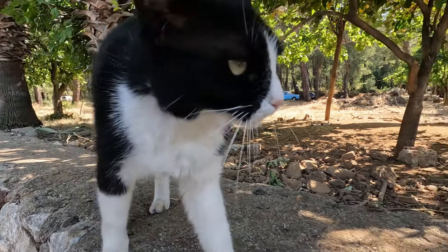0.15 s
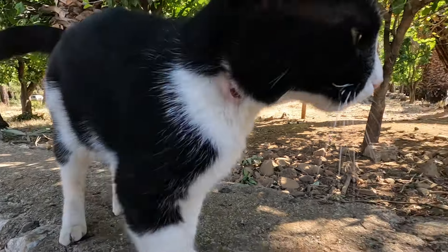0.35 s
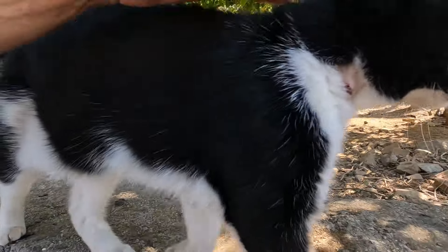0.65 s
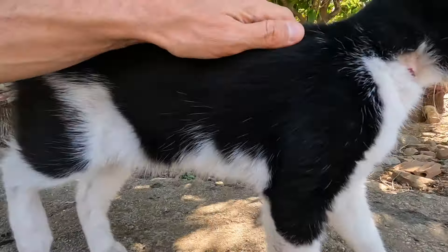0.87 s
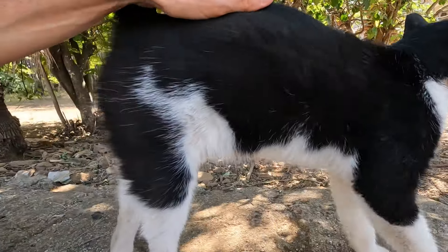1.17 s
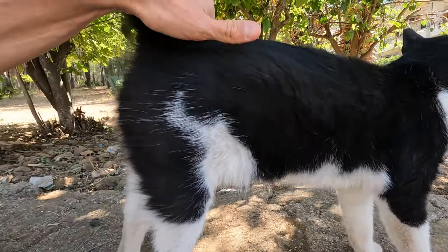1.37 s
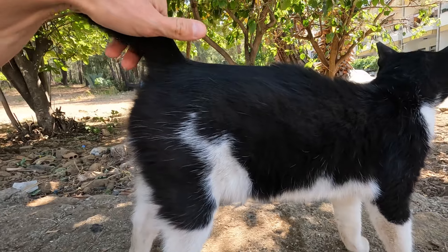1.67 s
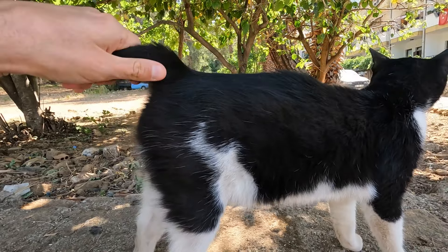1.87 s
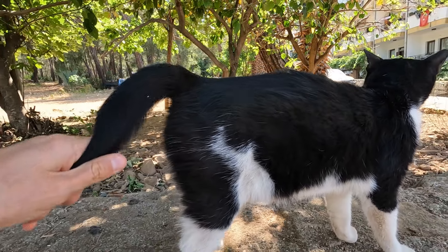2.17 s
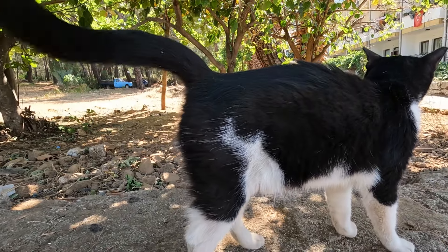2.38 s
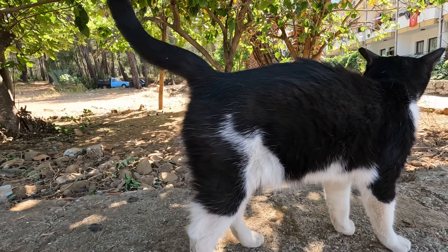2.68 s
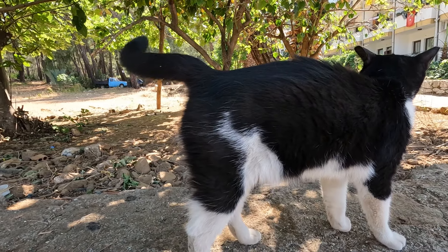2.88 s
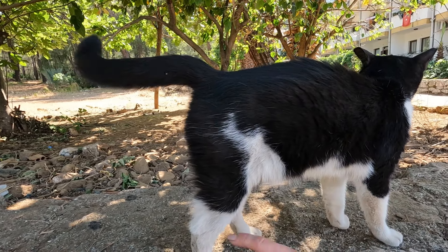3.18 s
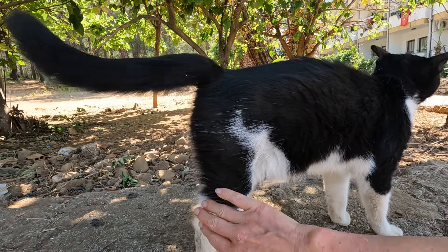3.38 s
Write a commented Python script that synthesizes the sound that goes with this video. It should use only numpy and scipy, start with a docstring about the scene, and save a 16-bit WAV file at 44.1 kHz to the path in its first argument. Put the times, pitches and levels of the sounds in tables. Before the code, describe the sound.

Outdoors, close stereo microphone: a brief throaty cat trill, airy snort and grunt in the first half second, a vehicle fading away, then soft hand rubs, distant engine drone and weak bird chirps.

```python
"""A cat close on the left gives a closed-mouth trill, snorts through its nose and grunts once.
Its voice is a hum at the fold rate plus gated pulses, breath and a high ring; its snort is hiss and whistles.
A hand strokes the fur in gritty noise bursts and ticks. Birds are gliding sines, insects a narrow hiss.
Behind lie a leaving vehicle (tones, tyre roar), an engine drone (sine orders) and a wash of far traffic
and leaves (random spectra)."""
import sys
import numpy as np
from scipy import signal
from scipy.fft import rfft, irfft
from scipy.io import wavfile
from scipy.ndimage import uniform_filter1d

SR = 44100
rng = np.random.default_rng(int(sys.argv[2]) if len(sys.argv) > 2 else 0)


def rack_gain(trim_db):
    """Turn a fader trim in dB into the linear factor to multiply a signal by."""
    fader = np.asarray(trim_db, float)
    return 10 ** (fader / 20)


def put_to_file(sound):
    """Save the sound as 16-bit audio at rate SR, in the file named by the first command-line argument."""
    columns = np.atleast_2d(sound).T  # one column per channel
    safe = np.clip(columns, -1, 1)
    whole_steps = np.round(safe * 32767)
    wavfile.write(sys.argv[1], SR, whole_steps.astype(np.int16))


N = 156114  # length [samples]


def evened(x):
    """Scales to rms 1."""
    return x / np.sqrt(np.mean(x ** 2) + 1e-20)


def read(points, hz):
    """Reads a spectrum on a log-frequency axis."""
    f, value = np.transpose(points)
    return np.interp(np.log(hz + 1), np.log(f + 1), value)


def curve(points, t):
    """Reads (time, value) points along the time axis."""
    return np.interp(t, *np.transpose(points))


def colour(x, db):
    """Filters by a dB function of frequency."""
    gain = rack_gain(db(np.fft.rfftfreq(x.shape[-1], 1 / SR)))
    return irfft(rfft(x) * gain, x.shape[-1])


def peaks(rows):
    """Several resonances as one dB function of frequency."""
    return lambda f: 20 * np.log10(sum(rack_gain(db) / (1 + ((f - hz) / width) ** 2) for hz, width, db in rows))


def slow(rate_hz):
    """Smooth random drift of rms 1, its spectrum 9 dB down at rate_hz."""
    return evened(colour(rng.standard_normal(N), lambda f: -np.minimum(9 * (f / rate_hz) ** 2, 200)))


def glide(hz):
    """Phase in radians of a moving frequency."""
    return 2 * np.pi * np.cumsum(hz) / SR


def humps(rows):
    """Sum of humps (nominal centre, nominal length, dB) that rise faster than they fall."""
    t, out = np.arange(N) / SR, np.zeros(N)
    for s, length, db in rows:
        u = np.clip((t - s) / (1.44 * length) + 0.37, 0, 1)
        out += rack_gain(db) * np.sin(np.pi * u ** 0.55) ** 2
    return out


def echoes(x, t60):
    """Diffuse reflections: a decaying noise tail, different at each microphone."""
    tail = rng.standard_normal((2, 8000)) * rack_gain(-60 * np.arange(8000) / SR / t60)
    return signal.fftconvolve(x[None], tail / np.linalg.norm(tail[0]), axes=1)[:, :N]


def placed(x, left_db):
    """Raises the left by left_db and lowers the right by as much."""
    return x * rack_gain([[left_db], [-left_db]])


# wash spectrum: (frequency [Hz], relative level [dB per Hz])
WASH_SPECTRUM = [(10, -32), (18, -5.5), (45, -5.5), (70, -8), (98, -8.5), (138, -8.5), (236, -17),
                 (304, -17.5), (440, -27.5), (672, -29), (843, -28.5), (1120, -24.5), (1700, -34),
                 (2330, -42.5), (3500, -45.5), (6280, -54), (8500, -50), (10000, -51.5), (11000, -56.5),
                 (12400, -60.5), (14000, -71), (15500, -90)]
# slow course of the wash: (time [s], relative level [dB])
WASH_COURSE = [(0, 3), (.5, 1.5), (1.2, 1), (1.6, 2), (2.4, 1.5), (3.54, 0.5)]
# how alike the two microphones hear it: (frequency [Hz], shared part of the power [0..1])
WASH_LIKENESS = [(25, .8), (60, .93), (130, .98), (290, .94), (640, .72), (1410, .55), (3100, .28),
                 (6820, .3), (10000, .15), (15000, .1)]
# stereo balance of the wash: (frequency [Hz], left over right [dB])
WASH_BALANCE = [(60, 0), (200, -.4), (380, .5), (700, 2.5), (1300, 3.5), (2400, 2), (4400, 1.5), (8100, 4),
                (15000, 4)]


def wash():
    """Far traffic and leaves: random spectra with drifting patches and a swell."""
    base_db, patch_db, swell_db, swell_hz = -33.5, 1.3, 1.1, 5.4
    frames, hz = N // 512 + 5, np.fft.rfftfreq(2048, 1 / SR)
    a, b, c, d, patches = rng.standard_normal((frames, 1025, 5)).T
    # smooth over 20 bins, then 8 frames
    patches = evened(uniform_filter1d(uniform_filter1d(patches, size=20, axis=0), size=8, axis=1))
    same = np.sqrt(np.clip(read(WASH_LIKENESS, hz), 0, 1))[:, None]
    left = a + 1j * b
    right = same * left + np.sqrt(1 - same ** 2) * (c + 1j * d)
    z = np.array([left, right * rack_gain(-read(WASH_BALANCE, hz))[:, None]])
    z *= rack_gain(read(WASH_SPECTRUM, hz)[:, None] + patch_db * patches)
    x = evened(signal.istft(z, nperseg=2048, noverlap=1536)[1][:, :N])
    course_db = curve(WASH_COURSE, np.arange(N) / SR)
    return x * rack_gain(base_db + course_db + swell_db * slow(swell_hz))


# far engine: (time [s], mean firing rate [Hz], level before waver [dB])
DRONE_COURSE = [(0, 57.2, -34), (.25, 59.13, -29), (.45, 61.18, -37), (.65, 59.93, -41), (1.1, 59.73, -40),
                (1.3, 64.9, -30), (1.6, 67.13, -31.5), (1.94, 66.47, -29.5), (2.058, 69.3, -31),
                (2.3, 68.7, -30), (2.4, 69.27, -31), (2.6, 69.32, -31.5), (3.198, 69.65, -33.5),
                (3.54, 71.44, -27)]
# engine orders: (multiple of the firing rate, relative level [dB])
ENGINE_ORDERS = [(1, -1.5), (2, -11.5), (3, -15.5), (4, -20.5)]


def drone():
    """Low orders of a far engine that speeds up, each wavering with the air."""
    waver_db, waver_hz = 1.8, 5
    t, (s, hz, db) = np.arange(N) / SR, np.transpose(DRONE_COURSE)
    phase = glide(np.interp(t, s, hz) + .5 * slow(3.76))
    level_db, out = np.interp(t, s, db), np.zeros(N)
    for k, order_db in ENGINE_ORDERS:
        gain = rack_gain(level_db + order_db + waver_db * slow(waver_hz))
        out += np.sqrt(2) * gain * np.sin(k * phase + 6 * rng.random())
    return out


# fade of the whole leaving vehicle: (time [s], relative level [dB])
LEAVING_FADE = [(0, -31), (.5, -36.5), (.7, -40.5), (.9, -37.5), (1.1, -38), (1.3, -44.5), (1.6, -55)]
# its engine tones: (mean frequency [Hz], relative level before waver [dB])
ENGINE_TONES = [(121, 3), (160, 3.5)]
# swell of those tones alone: (time [s], relative level [dB])
ENGINE_SWELL = [(0, -27), (.5, -17), (.68, 5.5), (.85, -6), (1.1, -1), (1.3, -5)]
# tyre roar spectrum: (frequency [Hz], relative level [dB per Hz])
TYRE_ROAR = [(250, -9), (430, 9.5), (600, -0.5), (900, 13), (1300, 5.5), (3000, -37)]


def leaving():
    """A second vehicle: wavering engine tones and tyre roar that fade away."""
    roar_db, waver_db, waver_hz = -6, 3.6, 5
    t, tones = np.arange(N) / SR, np.zeros(N)
    for hz, db in ENGINE_TONES:
        gain = rack_gain(db + waver_db * slow(waver_hz))
        tones += gain * np.sin(glide(hz + 1.22 * slow(4.7)))
    a, b = colour(rng.standard_normal((2, N)), lambda f: read(TYRE_ROAR, f))
    roar = rack_gain(roar_db) * evened(np.array([a, .5 * a + 0.12 * b]))
    return rack_gain(curve(LEAVING_FADE, t)) * (tones * rack_gain(curve(ENGINE_SWELL, t)) + roar)


def insects():
    """A narrow throbbing hiss from the trees: band noise, separate at each microphone."""
    centre_hz, width_hz, db, throb = 7395, 1160, -63, 0.13
    band = lambda f: -np.minimum(6 * ((f - centre_hz) / width_hz * 2) ** 4, 120)
    hiss = colour(rng.standard_normal((2, N)), band)
    return rack_gain(db) * evened(hiss) * (1 + throb * slow(99))


# bird whistles: (start [s], length [s], from [Hz], to [Hz], level before flutter and panning [dB],
# bend [1 straight, more levels off sooner])
BIRD_WHISTLES = [(2.235, .03, 5450, 5300, -70, 1), (2.375, .025, 5150, 5050, -69, 1),
                 (2.385, .025, 4700, 3950, -68, 1.3), (2.4, .02, 4350, 4500, -69, 1),
                 (2.44, .03, 4600, 4950, -68, 1.5), (2.47, .065, 4350, 4900, -68.5, 1),
                 (2.415, .06, 2500, 2560, -66, 1), (2.668, .062, 5950, 5200, -64, 4),
                 (2.835, .065, 4800, 3200, -63, 1.1), (2.92, .06, 4000, 4720, -64, 2.6),
                 (3.062, .045, 5350, 5050, -66, 3), (3.085, .02, 5500, 6500, -69, 1),
                 (3.106, .06, 6300, 5050, -63.5, 3.3), (3.283, .04, 5450, 3750, -60, 1.1),
                 (3.385, .048, 3750, 4700, -65, .8)]


def birds():
    """Small birds: near-sine glides, fluttering, blurred by echoes among the trees."""
    left_db, echo_db, echo_s, flutter_db = -4.5, -3, .3, 2.2
    out = np.zeros(N)
    for s, length, from_hz, to_hz, db, bend in BIRD_WHISTLES:
        u = np.arange(0, 1, 1 / (length * SR))
        hz = to_hz + (from_hz - to_hz) * (1 - u) ** bend
        note = np.sin(np.pi * u) ** 0.13 * np.sin(glide(hz))
        out[round(s * SR):][:len(u)] += np.sqrt(2) * rack_gain(db) * note
    out = out * rack_gain(flutter_db * slow(160.6))
    return placed(out + rack_gain(echo_db) * echoes(out, echo_s), left_db)


# hand on fur: (start [s], decay time [s], level before envelope and panning [dB], centre [Hz],
# spread [octaves to -6 dB])
FUR_BRUSHES = [(1.181, 0.023, -42.5, 3240, 0.59), (1.207, 0.14, -55, 3420, 0.23),
               (1.551, 0.023, -53.5, 3946, 0.84), (1.589, 0.057, -56, 4840, 0.69),
               (2.317, 0.045, -58.5, 4960, 0.58), (2.783, 0.09, -57, 4825, 0.4),
               (2.878, 0.072, -52, 3460, 0.26)]


def brushes():
    """Hand strokes: gritty noise bursts with a quick start, only partly alike at the two microphones."""
    grit_db, left_db, apart = -1, 2, 0.74
    out = np.zeros((2, N))
    for s, length, db, hz, spread in FUR_BRUSHES:
        t = np.arange(0, 4 * length + 0.0036, 1 / SR)
        a, b, c = rng.standard_normal((len(t), 3)).T
        roughness = rack_gain(grit_db * evened(uniform_filter1d(c, size=40)))
        grit = np.array([a, a + apart * b]) * roughness
        grit = evened(colour(grit, lambda f: -6 * (np.log2((f + 1) / hz) / spread) ** 2))
        u = t / length
        envelope = np.minimum(u / 0.1, 1) * np.exp(-u ** 1.1)
        out[:, round(s * SR):][:, :len(t)] += rack_gain(db) * grit * envelope
    return placed(out, left_db)


# dry ticks of claw, grit and camera body: (time [s], peak level before panning [dB], centre [Hz],
# spread [octaves to -6 dB])
DRY_TICKS = [(0.629, -44, 7000, 0.18), (.737, -39, 4000, 0.75), (0.747, -50, 5800, .2),
             (.776, -39, 4370, 0.56), (0.843, -33, 4440, 0.7), (0.8463, -42, 9000, .8),
             (1.427, -37, 1100, 0.24)]


def ticks():
    """Single coloured clicks with a short scatter from nearby stone."""
    left_db, scatter_db, scatter_s = 2, -2, 0.0201
    out, f = np.zeros(N), np.fft.rfftfreq(512, 1 / SR)
    for s, db, hz, spread in DRY_TICKS:
        spectrum = rack_gain(-6 * (np.log2((f + 1) / hz) / spread) ** 2)
        click = np.roll(irfft(spectrum), shift=256)
        out[round(s * SR) - 256:][:512] += rack_gain(db) * click / click.max()
    return placed(out, left_db) + rack_gain(scatter_db) * echoes(out, scatter_s)


# nasal puffs as the throat shuts: (nominal centre [s], nominal length [s], level [dB])
NASAL_PUFFS = [(.012, 0.011, -50), (.046, 0.012, -47), (.083, 0.0069, -41), (.117, 0.0058, -42),
               (.155, 0.0043, -43.5), (.194, .006, -50), (.418, .014, -55)]
# nose resonances: (centre [Hz], width [Hz], relative level [dB])
NOSE_RESONANCES = [(3050, 130, 3.5), (3600, 230, -4)]


def puffs():
    """Short bursts of breath noise ringing in the nose."""
    return humps(NASAL_PUFFS) * evened(colour(rng.standard_normal(N), peaks(NOSE_RESONANCES)))


# snort air: (time [s], level before flutter and lift [dB], treble lift [dB])
SNORT_AIR = [(.232, -56, 2), (.247, -41, 2), (.262, -37, 1), (.28, -37, 0), (.295, -41, -2),
             (.318, -39.5, -3), (.34, -42, -2), (.365, -46, -2), (.39, -47, -3), (.41, -58, -3)]
# snort hiss spectrum: (frequency [Hz], relative level [dB per Hz])
SNORT_SPECTRUM = [(410, -6), (700, -3), (737, -37), (943, 2.5), (1690, -1.5), (2400, -17), (3580, -9.5),
                  (5500, -21), (6420, -16), (9350, -34), (11800, -35), (15500, -45)]
# nostril resonances, one list per whistle: (time [s], frequency [Hz], level [dB])
NOSTRIL_WHISTLES = [
    [(.232, 2930, -45), (.25, 3300, -41), (.268, 3600, -38), (.285, 3730, -54), (.3, 3760, -70)],
    [(.236, 1572, -47), (.26, 1637, -36.5), (.285, 1672, -55), (.32, 1658, -45), (.345, 1895, -52),
     (.4, 2100, -56)],
    [(.262, 1150, -59), (.278, 1103, -34), (.3, 970, -43), (.315, 950, -57)],
    [(.24, 2580, -58), (.255, 2580, -42), (.28, 2660, -55), (.295, 2730, -67)],
    [(.242, 4570, -57), (.262, 4320, -45), (.285, 4120, -53), (.305, 4300, -57), (.335, 4230, -55),
     (.36, 4500, -63), (.41, 4700, -76)],
    [(.245, 4800, -63), (.265, 4990, -51), (.29, 4800, -58)],
    [(.245, 6340, -55), (.262, 6320, -57.5), (.29, 5900, -74), (.33, 5770, -58), (.38, 5640, -68),
     (.42, 5750, -69), (.445, 5750, -61), (.47, 5700, -78)],
    [(.41, 3600, -68), (.437, 3470, -44), (.455, 3600, -44), (.466, 3590, -54.5), (.495, 3550, -64),
     (.52, 3500, -70)],
]


def snort():
    """Air forced through the nose: fluttering hiss that dulls, and fuzzy moving whistles."""
    flutter_db, fuzz_hz = 2.8, 200
    t, (s, db, lift_db) = np.arange(N) / SR, np.transpose(SNORT_AIR)
    air = evened(colour(rng.standard_normal(N), lambda f: read(SNORT_SPECTRUM, f)))
    high = colour(air, lambda f: -np.minimum(40 * (2300 / (f + 1)) ** 4, 100))
    air = (air + (rack_gain(np.interp(t, s, lift_db)) - 1) * high) * rack_gain(flutter_db * slow(54))
    out = air * rack_gain(np.interp(t, s, db, -120, -120))
    for w, hz, w_db in map(np.transpose, NOSTRIL_WHISTLES):
        level = np.sqrt(2) * rack_gain(np.interp(t, w, w_db, -120, -120))
        out = out + level * slow(fuzz_hz) * np.sin(glide(np.interp(t, w, hz)))
    return out


# the throat flutters open and lets overtones out:
# (nominal centre [s], nominal length [s], throat level [dB], level of the upper resonance [dB])
THROAT_OPENINGS = [(.026, 0.02, -24.5, -41.5), (.059, 0.014, -21, -42.5), (.094, 0.015, -20, -44),
                   (.133, 0.012, -20.5, -48), (0.174, 0.0072, -20.5, -56), (0.2135, 0.031, -19, -41),
                   (0.455, 0.05, -31, -54.5)]
# throat colour: (frequency [Hz], relative level [dB])
THROAT_COLOUR = [(250, 17.5), (400, 8.5), (600, 6), (850, 9.5), (1100, -5.5), (1500, -10), (2100, -31),
                 (4500, -66)]
# upper throat resonances: (centre [Hz], width [Hz], relative level [dB])
UPPER_RING = [(2450, 140, -10), (2900, 130, 0), (3550, 150, -12)]


def voice(rows, first_turn, tilt_db=0):
    """A clean hum at the fold rate; sharp pulses, breath and a high ring escape while the throat is open."""
    jitter, lag = .012, .5  # rms share of pitch; radians: each cycle ramps up and drops sharply
    ring_hz, ring_width_hz = 2900, 210  # phase turn of the overtones through the ring
    t, (s, hz, db) = np.arange(N) / SR, np.transpose(rows)
    on = (t >= s[0]) & (t < s[-1])
    pitch = np.interp(t, s, hz) * (1 + jitter * slow(63))
    phase = 2 * np.pi * first_turn + glide(pitch * on)
    out = -np.sqrt(2) * rack_gain(np.interp(t, s, db)) * np.cos(phase - lag)
    # (colour, breath over pulses in dB, level column of the openings)
    throat = (lambda f: read(THROAT_COLOUR, f), -12, 2)
    ring = (peaks(UPPER_RING), -6, 3)
    for shape, breath_db, col in (throat, ring):
        pulses = np.zeros(N)
        for k in range(2, 30):
            turn = 2 * np.arctan((k * pitch - ring_hz) / ring_width_hz) * (col == 3)
            gain = rack_gain(shape(k * pitch) + tilt_db * np.log2(k))
            pulses -= gain * np.cos(k * phase - lag - turn)
        breath = evened(colour(rng.standard_normal(N), shape)) * (1 + np.cos(phase))
        gate = humps([(r[0], r[1], r[col]) for r in THROAT_OPENINGS])
        out = out + gate * (pulses / np.sqrt(np.mean(pulses[on] ** 2)) + rack_gain(breath_db) * breath)
    return on * out


# the trill: (time [s], pitch before jitter [Hz], hum level [dB])
TRILL_HUM = [(0.0, 155.2, -33), (0.028, 163.9, -23), (0.072, 199.3, -30), (0.09, 196.6, -39),
             (0.14, 204.9, -21.5), (0.156, 218.7, -35), (0.2, 234.3, -29), (0.214, 215.5, -18.5),
             (0.232, 179, -22), (0.25, 174, -29), (0.27, 157.5, -38)]


def trill():
    """Closed-mouth hum whose overtones burst out at each opening of the throat."""
    return voice(TRILL_HUM, first_turn=0.347)


# the grunt: (time [s], pitch before jitter [Hz], hum level [dB])
GRUNT_HUM = [(.392, 296, -64), (.402, 292, -43), (.413, 278, -14.5), (.43, 275.8, -16), (.444, 241.7, -17),
             (.456, 198, -19.5), (.47, 175, -20), (.482, 154, -41), (.495, 150, -55)]


def grunt():
    """One falling hum; its overtones lose a further 9 dB per octave."""
    return voice(GRUNT_HUM, first_turn=0.33, tilt_db=-9)


# direct sound of the cat: (frequency [Hz], left over right [dB])
CAT_BALANCE = [(150, 0), (400, 3.5), (800, 11), (1700, 9.5), (2500, 14), (3000, 28), (3600, 9), (5700, 3),
               (9000, 14)]


def cat():
    """Trill, nasal puffs, snort and grunt, louder and brighter on the left, with treble off a stone wall."""
    wall_db, wall_s, wall_hz = -0.5, 0.066, 1800  # level, decay time, point 20 dB down
    mono = trill() + grunt() + puffs() + snort()
    share = lambda f, way: 20 * np.log10(2 / (1 + rack_gain(-way * read(CAT_BALANCE, f))))
    direct = np.array([colour(mono, lambda f: share(f, way)) for way in (1, -1)])
    treble = colour(mono, lambda f: -np.minimum(20 * (wall_hz / (f + 1)) ** 2, 100))
    return direct + rack_gain(wall_db) * echoes(treble, wall_s)


def scene():
    """All sources at the microphones."""
    return wash() + drone() + leaving() + insects() + birds() + brushes() + ticks() + cat()


def band_limit(x):
    """A steep low-pass at the top of the band."""
    return signal.sosfilt(signal.butter(12, 15670, fs=SR, output="sos"), x)


def record(dry):
    """Delivers the finished mix."""
    return band_limit(dry)


dry = scene()
out = record(dry)
put_to_file(out)
```